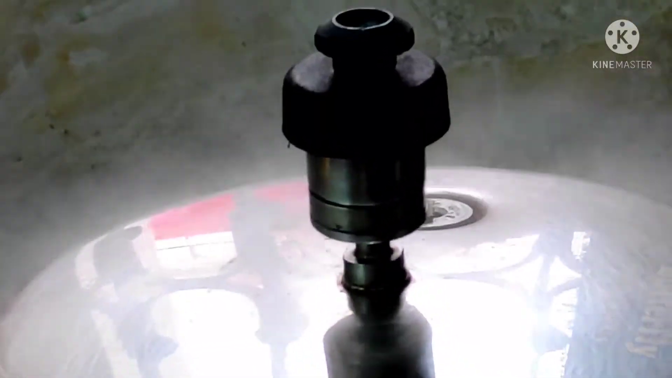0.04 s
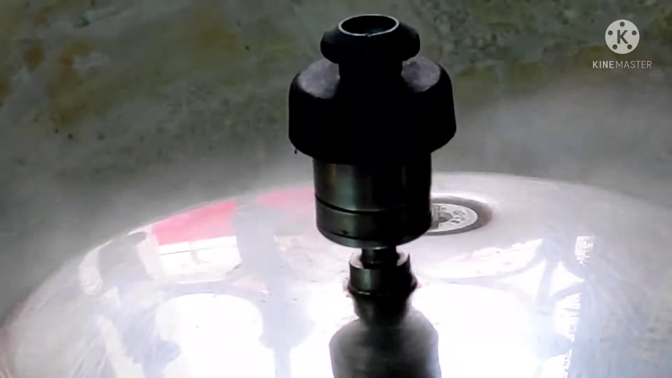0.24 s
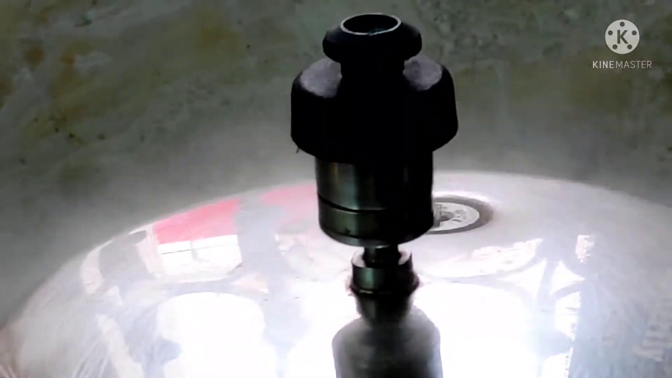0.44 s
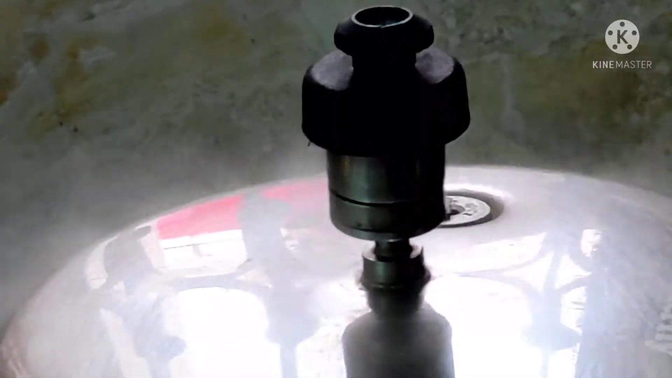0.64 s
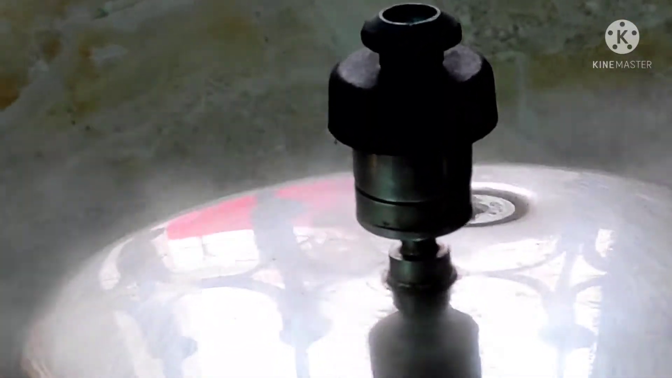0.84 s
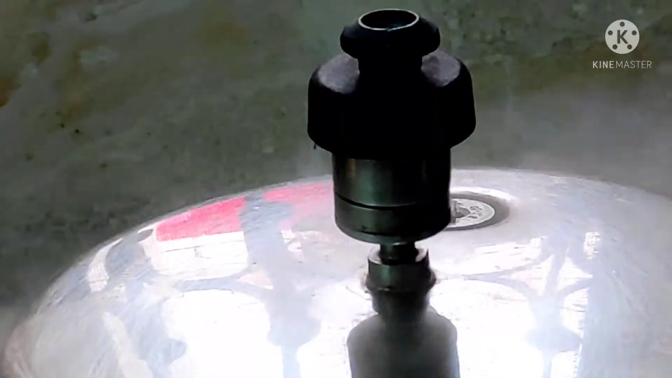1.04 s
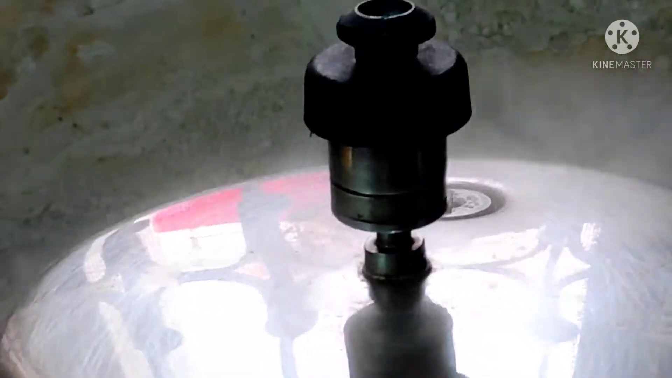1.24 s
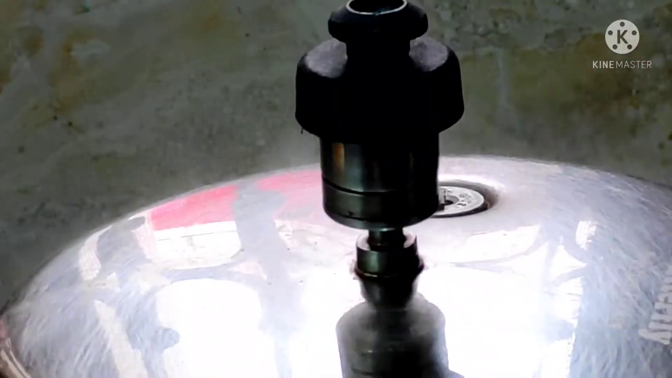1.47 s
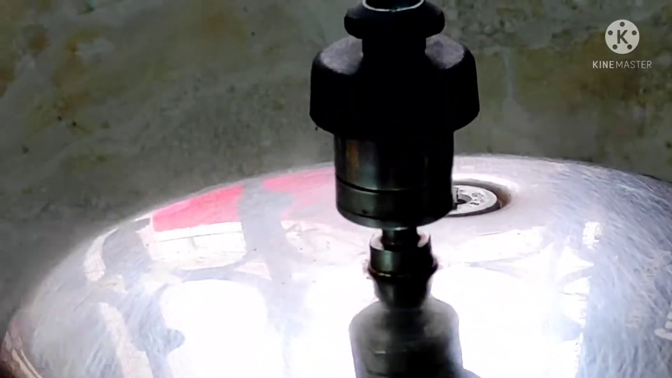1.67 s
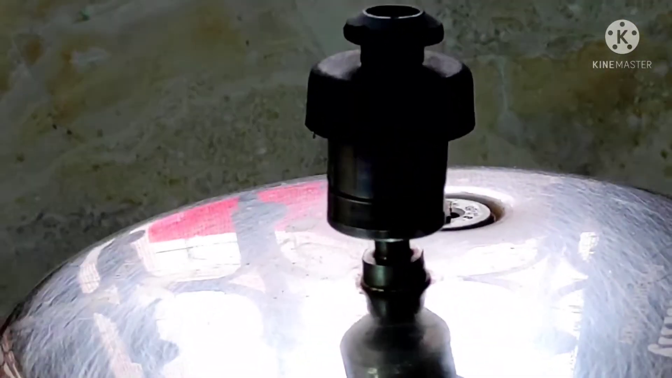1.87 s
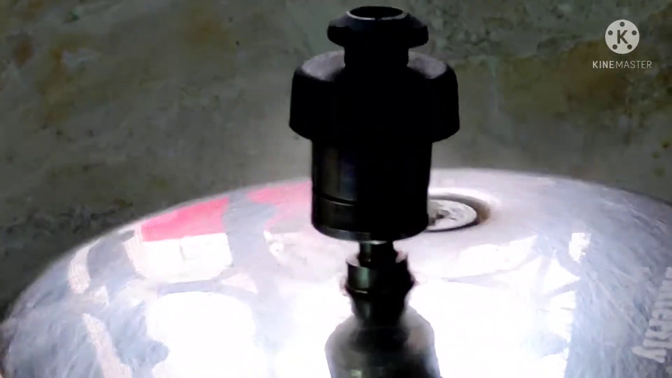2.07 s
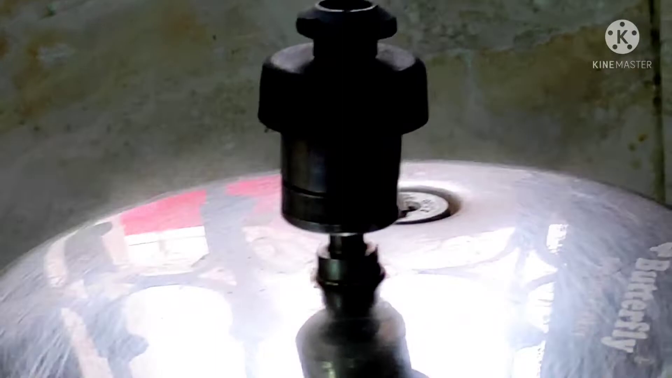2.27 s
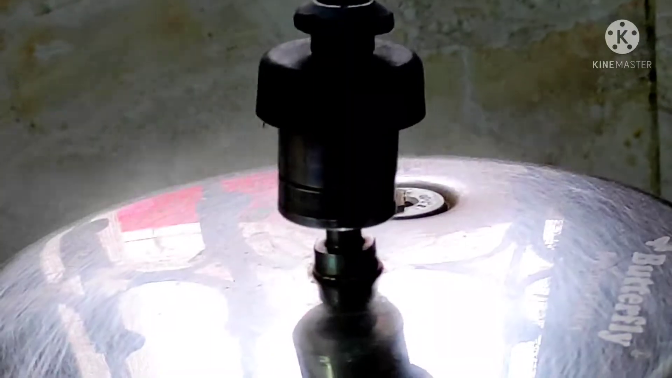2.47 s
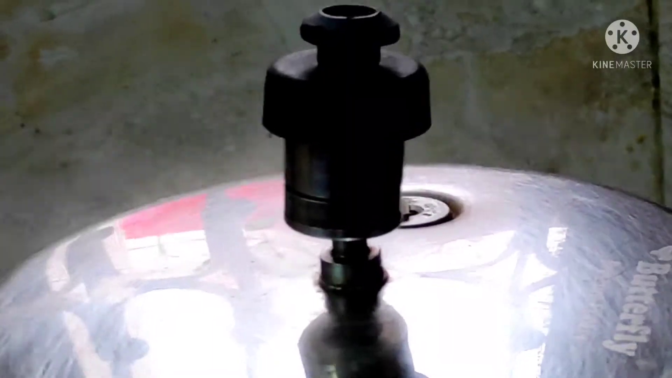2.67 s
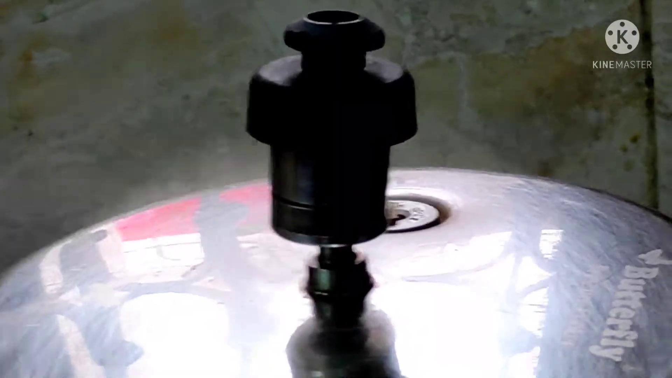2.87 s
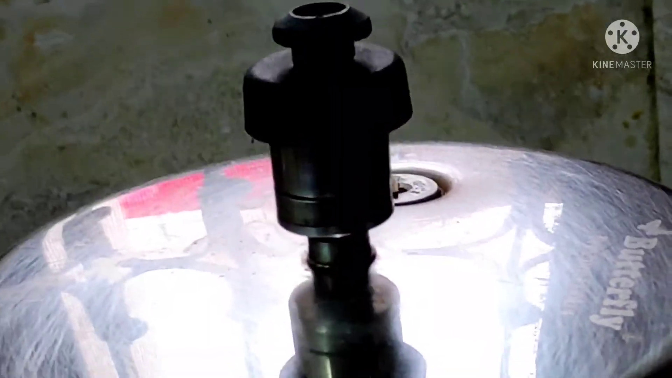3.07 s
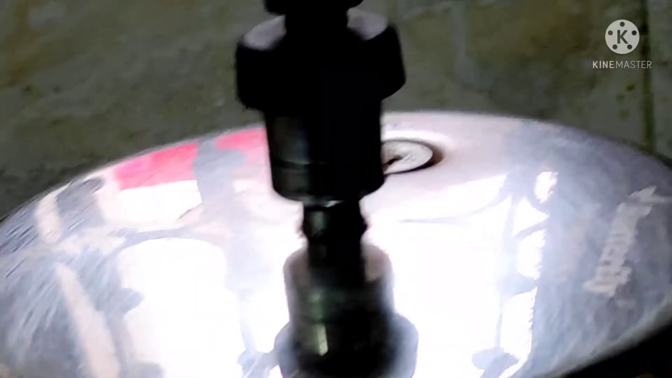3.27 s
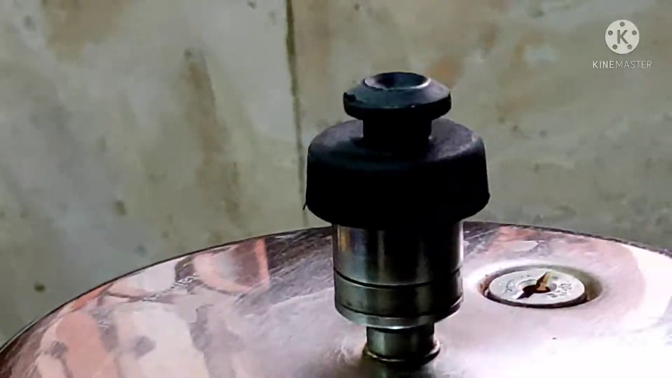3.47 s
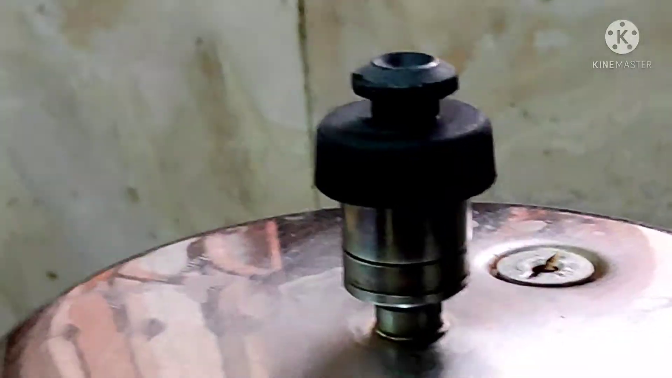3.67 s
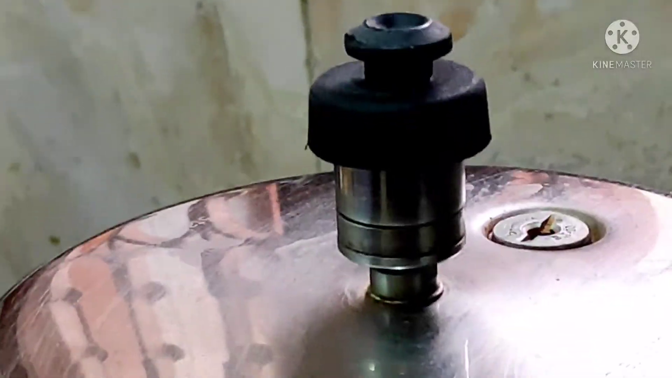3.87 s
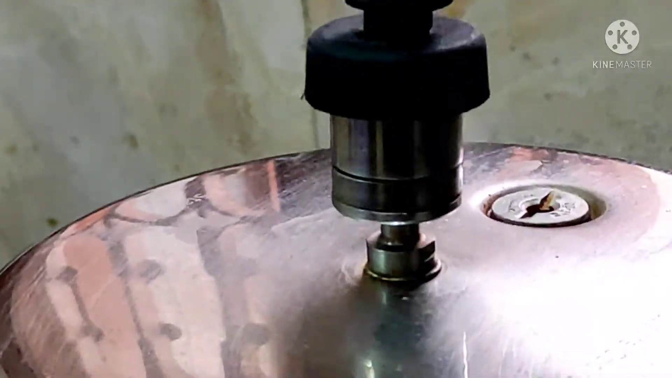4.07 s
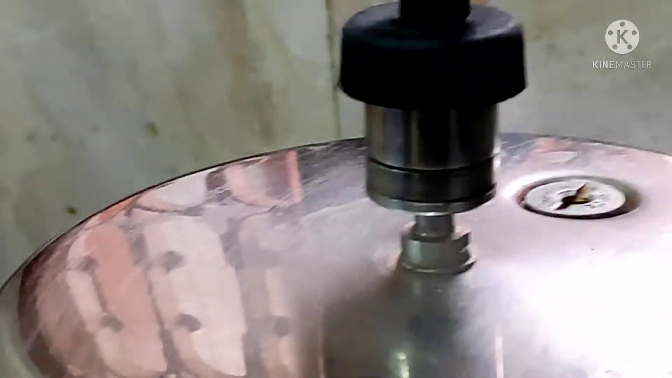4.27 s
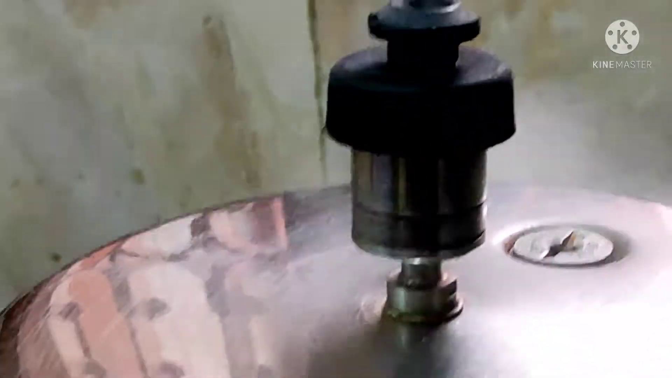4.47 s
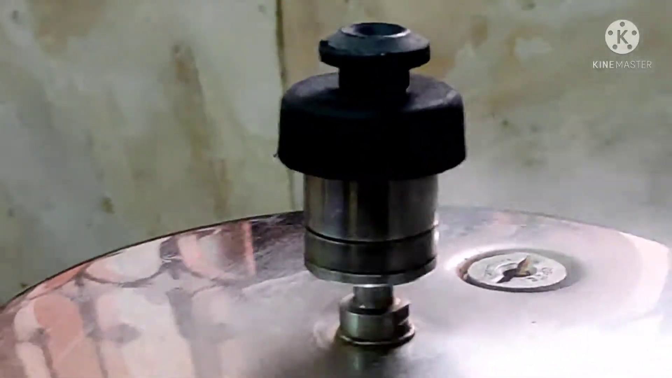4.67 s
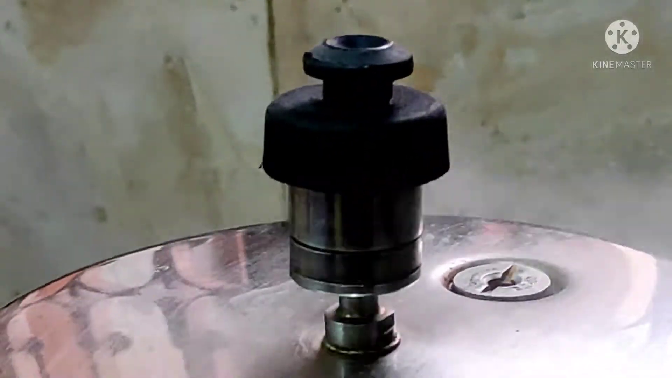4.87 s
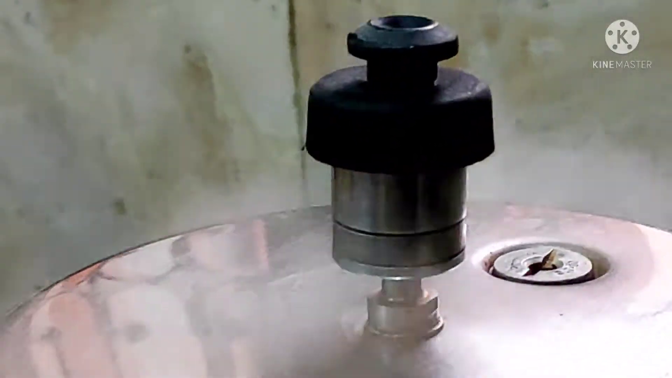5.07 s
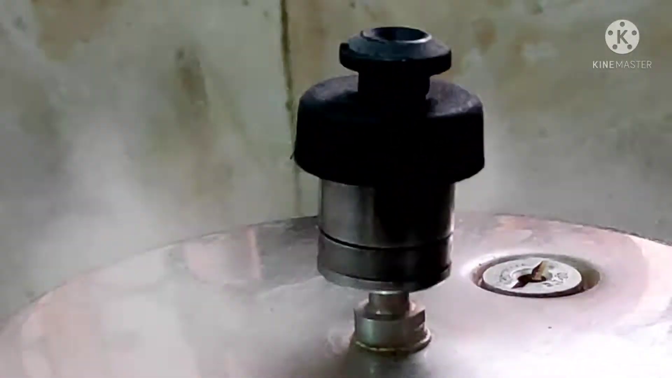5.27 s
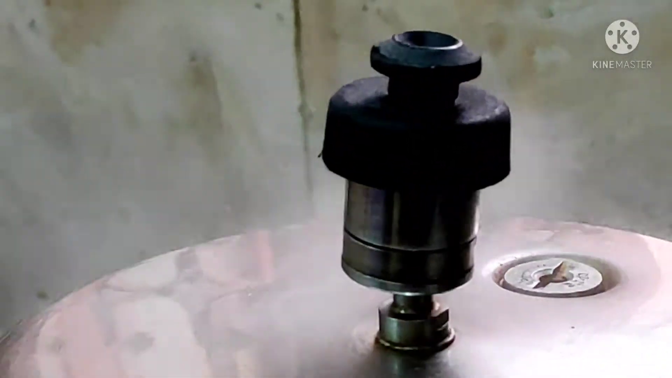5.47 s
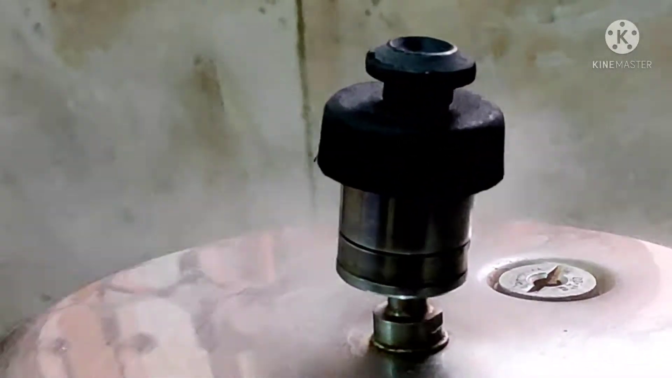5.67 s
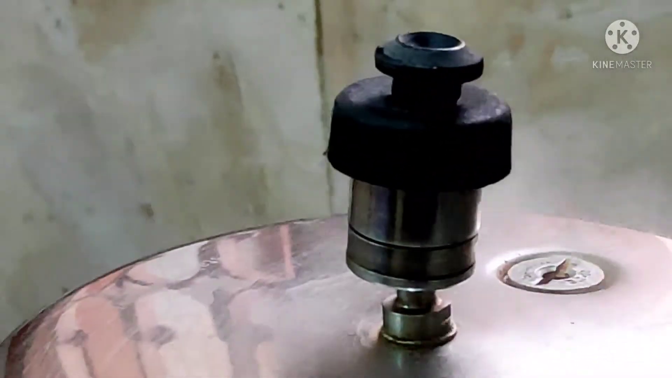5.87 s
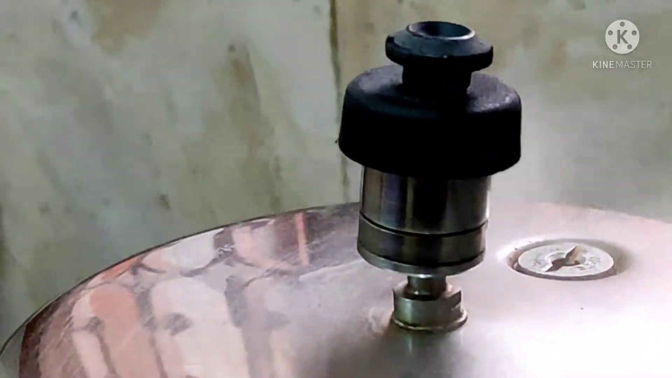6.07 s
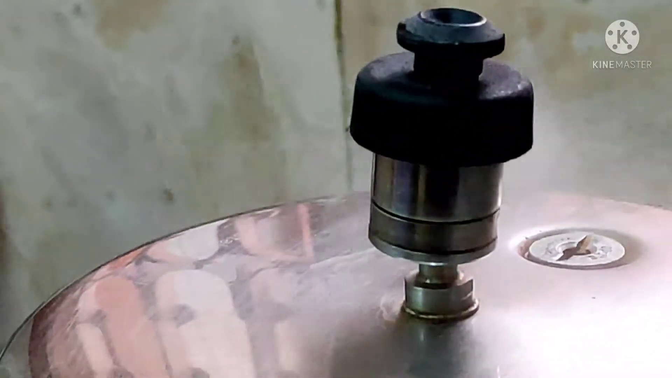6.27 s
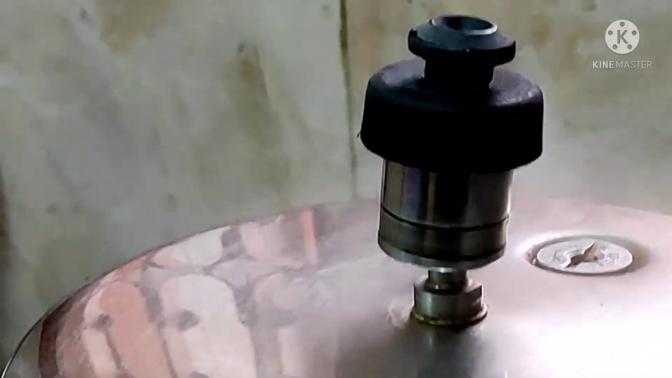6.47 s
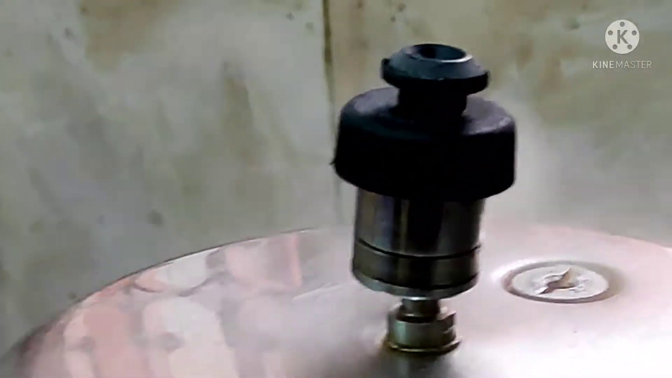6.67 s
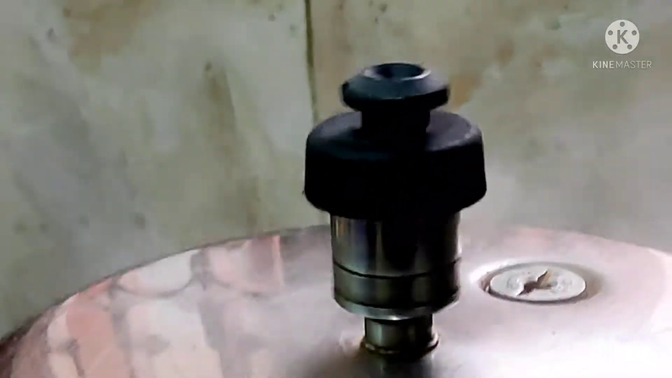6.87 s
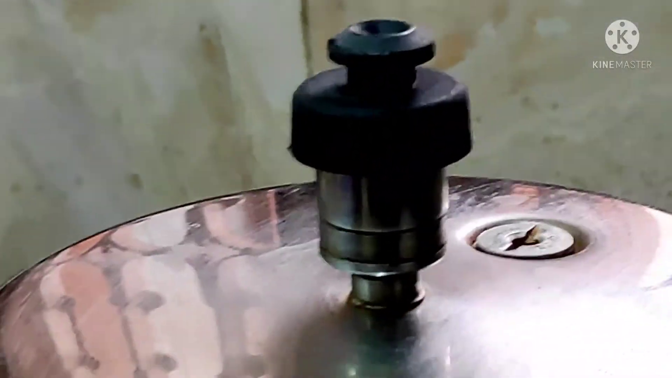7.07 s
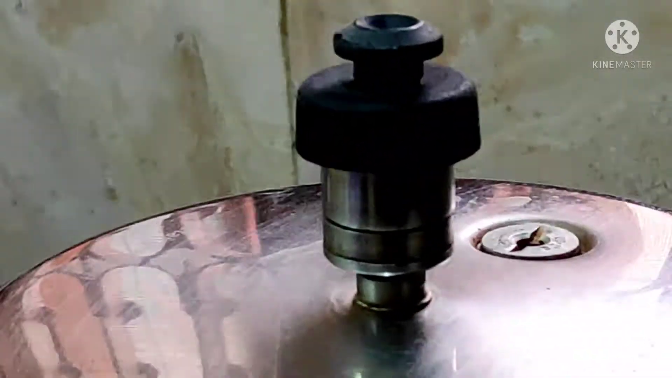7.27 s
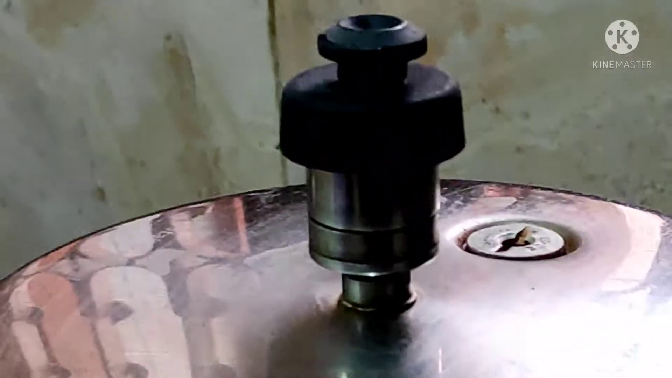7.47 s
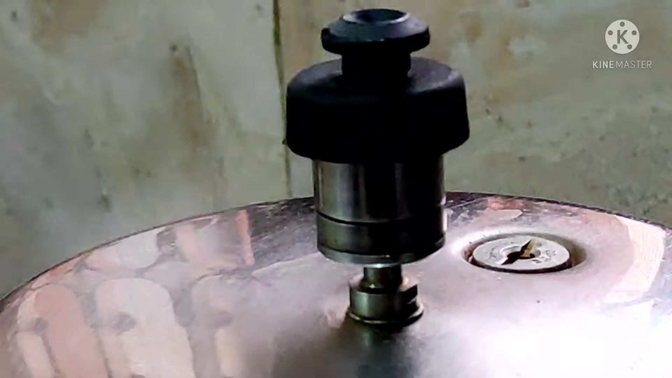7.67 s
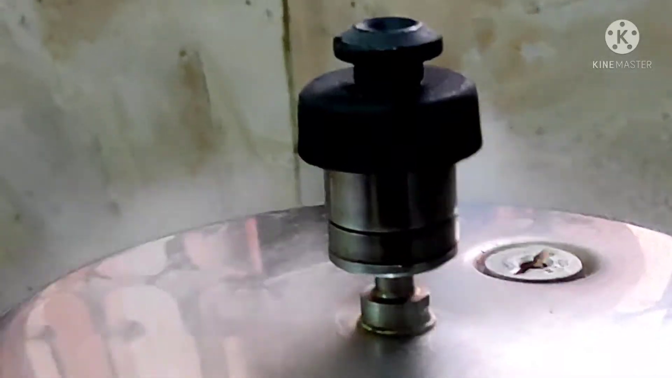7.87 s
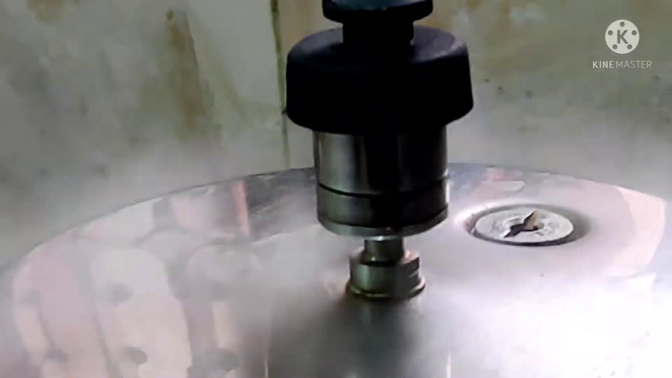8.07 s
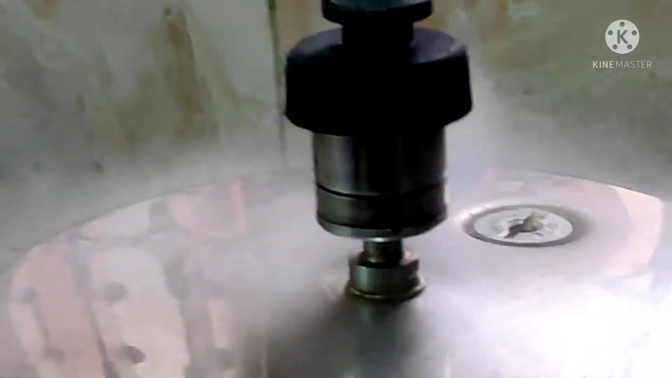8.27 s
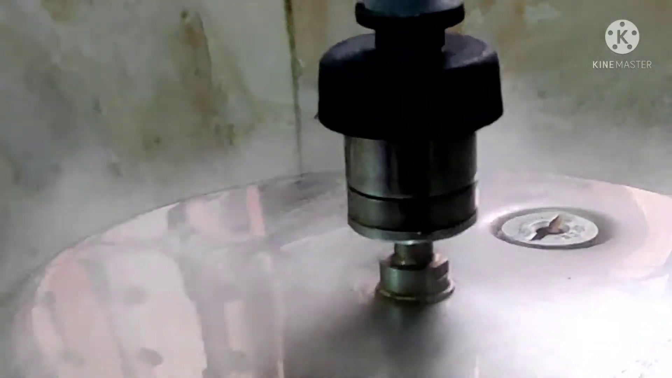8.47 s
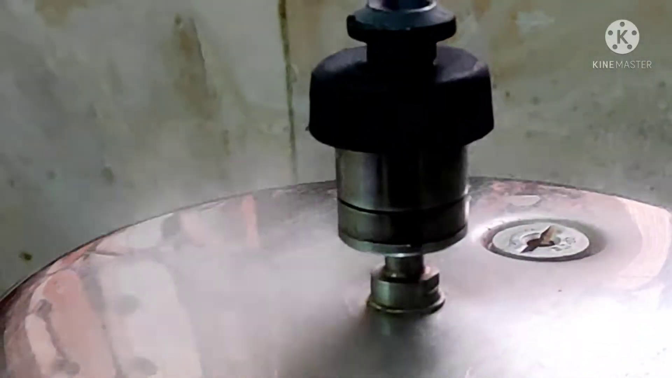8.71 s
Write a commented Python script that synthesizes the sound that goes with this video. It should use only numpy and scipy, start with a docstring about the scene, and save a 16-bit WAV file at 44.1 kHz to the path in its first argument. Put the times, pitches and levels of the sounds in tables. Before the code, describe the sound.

From 0 s a pressure cooker's valve is already wide open, close to the microphone: a loud, broad steam roar under a piercing, very high hiss, fluttering slightly, with brief gusts and low buffeting of air, strongest on the left. It sags slightly until about 3.0 s, when the weight drops and the jet dies within a fraction of a second in a hollow, downward-sinking gush with a faint lid ring. Near quiet, with dull kitchen background, lasts until 3.26 s; then a thin, high leak cracks on, spits around 3.5 s and grows. At 3.9 s the full blast surges back and holds until 6.8 s, then sinks the same way. At 7.1 s a stuttering leak begins with light metallic knocks at 7.07 and 7.27 s. At 7.5 s the final blast bursts open, slightly stronger and with heavier wind buffeting, roaring until the end near 8.7 s.

```python
"""A pressure cooker vents on a stove in a small kitchen, close to a two-port microphone.
At first the weight is up: the jet roars under a very high hiss, both shaped noise, and its draught
buffets the ports. The weight drops with a sinking gush, then the valve cracks open, leaks thinly and
lifts again into a full jet. The same drop, leak and lift follow once more, now with light knocks of the
weight that ring the lid (decaying sines); the last jet runs to the end."""
import sys
import numpy as np
from scipy import signal
from scipy.fft import rfft, irfft
from scipy.io import wavfile
from scipy.ndimage import uniform_filter1d, minimum_filter1d

SR = 44100
rng = np.random.default_rng(int(sys.argv[2]) if len(sys.argv) > 2 else 0)


def waveform_to_disk(signal):
    """Save audio, clipped to [-1, 1], as 16-bit WAV at the path in sys.argv[1]."""
    frames = np.transpose(np.atleast_2d(signal))
    scaled = np.clip(frames, -1, 1) * 32767
    samples = np.round(scaled).astype(np.int16)
    wavfile.write(sys.argv[1], SR, samples)


N = 385434
T = np.arange(N) / SR  # s

# Spectral densities. Each row: frequency in Hz, relative level in dB.
HISS_SPECTRUM = [(1000, -51), (4000, -32), (6000, -26.5), (7000, -20), (9000, -18.5), (10500, -13),
                 (12000, -8.5), (12700, -8.5), (13500, -1.5), (14700, 0.5), (15500, 3)]
ROAR_SPECTRUM = [(40, -34), (150, -7.5), (240, -10.5), (310, -0.84), (600, -0.8), (1300, -1.24), (3000, 1),
                 (5200, 2.5), (6000, 2), (6800, -9), (8500, -7), (11000, -2.5), (15500, -62.5)]
LEAK_HISS_SPECTRUM = [(1000, -57), (4000, -39), (6000, -29), (8000, -24.5), (9700, -20), (11000, -10),
                      (12000, -8), (13000, -2.5), (14700, 1), (15500, 3)]
LEAK_RUSH_SPECTRUM = [(100, -15), (240, -10), (320, -2), (800, -2.5), (1500, -3), (3000, 1), (3900, -3),
                      (4800, 3.3), (5800, 2), (6800, -5), (9000, 1.5), (15000, -16)]
DRAUGHT_SPECTRUM = [(5, -2), (25, 3), (60, -1.5), (130, -5), (250, -9), (600, -32), (2000, -64)]
KITCHEN_SPECTRUM = [(20, 0), (130, -2), (270, -9), (380, -6), (900, -3), (1300, -8), (2200, -17),
                    (3500, -20), (8000, -27), (15000, -32)]
# Correlation of the two ports. Each row: frequency in Hz, correlation from -1 to 1.
PORT_CORRELATION = [(100, 0), (1400, 0.07), (5000, 0.06), (9000, 0.12), (12000, -0.39), (15000, -0.32)]
# Side lean of each jet. Each row: frequency in Hz, left minus right in dB.
ROAR_LEAN = [(100, 2.3), (380, 5.7), (1300, 3.6), (2400, 2.6), (4400, 0.4), (12000, 0.77)]
HISS_LEAN = [(6000, 1), (11000, 1), (15000, -3)]
# A wider jet makes bigger eddies. Each row: frequency in Hz, relative dB for each dB of roar.
DEEPENING_SLOPE = [(100, 1.5), (400, 1.66), (1200, 0.92), (4000, 0.3), (8000, -0.35), (15000, 0)]
# Reverberation of the kitchen. Each row: frequency in Hz, t60 in seconds.
WALL_T60 = [(200, 0.098), (500, 0.51), (1200, 0.33), (3000, 0.26), (7000, 0.19), (15000, 0.1)]
# Light knocks of the weight on its seat. Each row: time in seconds, level in dB.
WEIGHT_KNOCKS = [(7.074, -46), (7.273, -49)]
# Modes of the lid. Each row: frequency in Hz, level in dB, t60 in seconds (knocks only).
LID_MODES = [(430, -2, 0.08), (620, -11, .07), (816, 0, .06), (1120, -9, 0.06)]
# Gusts of steam toward the microphone. Each row: centre in seconds, half length in seconds,
# extra roar in dB, extra draught in dB.
STEAM_GUSTS = [(.12, .04, 0, 1), (0.367, 0.017, 2, 5), (0.615, 0.1, 1, 4), (0.923, 0.067, 1, 3.5),
               (1.17, .04, 0.7, 2), (2.0, 0.099, .5, 0), (3.97, .02, 1, 3), (4.05, 0.024, .8, 3),
               (5.447, .15, .5, -2.5), (6.0, 0.12, 1.06, 0), (6.723, 0.066, 0.54, 3), (7.603, 0.051, .5, 2)]
# Spurts and catches of the leak as the weight teeters. Each row: centre in seconds,
# half length in seconds, extra leak hiss in dB.
LEAK_SPURTS = [(3.52, .015, 7), (3.594, 0.021, 6), (7.118, 0.024, 2.5), (7.19, .015, -5), (7.24, 0.011, 0),
               (7.313, 0.013, 2), (7.355, .015, -3)]
# Blasts of the valve. Each row: crack in seconds, lift in seconds, drop in seconds, first leak hiss in dB,
# hiss in dB, roar in dB, draught at the lift in dB, settled draught in dB,
# extra hiss under HISS_SKIRT_HZ in dB, first leak rush in dB.
VALVE_BLASTS = [(-1.0, -0.2, 2.981, -35, -13.2, -21.3, -37.5, -46.5, .9, -50),
                (3.26, 3.878, 6.811, -36, -13.3, -20.9, -37, -44.5, 1.8, -50),
                (7.089, 7.473, 9.5, -28, -13.6, -19.9, -31.5, -35, -.7, -44.5)]

EDGE_HZ = 15560
KITCHEN_DB, WALLS_DB = -56, -16.5
# lower skirt of the hiss: weaker until the weight has lifted
HISS_SKIRT_HZ, LOW_SKIRT_DB = 11300, -5.5
# leak: abrupt start, growth to a steady level, rush far under the hiss
CRACK_S, LEAK_GROW_S, LEAK_HISS_DB = 0.007, 0.58, -21
LEAK_RUSH_DB, LEAK_RUSH_GROW_S = -43.5, 0.42
# floating weight: the hiss is full shortly before the lift, the roar only stirs
FLOAT_S, HISS_LEAD_S, FLOAT_ROAR_DB = 0.14, 0.012, -34
FLOAT_EXPONENT = 0.15  # small: comes quickly, then levels off
# lift: a surge that sags as the pressure falls
LIFT_S, SURGE_SAG_S, ROAR_SURGE_DB, ROAR_SAG_DB_PER_S = 0.026, 0.66, 1.16, 0.355
# drop: final fall rate in dB/s, easing in s
HISS_FALL, ROAR_FALL, DRAUGHT_FALL = (450, 0.099), (320, 0.03), (300, 0.037)
DRAUGHT_LEAD_S = 0.05  # the draught dies before the drop
# floors: a little steam seeps and the air stirs with the valve shut
SEEP_HISS_DB, SEEP_RUSH_DB, STILL_AIR_DB, OFF_DB = -49, -62, -66.5, -100
# lid ring as the jet is choked off
RING_DB, RING_WIDTH_HZ, RING_AFTER_S, RING_HALF_S = -51.5, 47, 0.1, 0.048
# last gush: a hollow noise band that sinks as the steam slows
GUSH_HZ, GUSH_WIDTH_HZ, GUSH_SINK_OCT_PER_S = 1290, 560, 3
GUSH_DB, GUSH_AFTER_S, GUSH_HALF_S = -33, 0.049, 0.034
WHISTLE_DB, WHISTLE_HZ, WHISTLE_WIDTH_HZ = -44, 3750, 600
PRESSURE_DIP_DB, PRESSURE_DIP_S = -42.0, 0.041


def gain_of(db):
    """Decibels to amplitude."""
    return 10 ** (np.asarray(db) / 20)


def evened(x):
    """Scales to an rms of one."""
    return x / np.sqrt(np.mean(x ** 2) + 1e-20)


def read(points, hz):
    """Interpolates a table along a logarithmic frequency axis."""
    f, value = np.transpose(points)
    return np.interp(np.log(hz + 1), np.log(f + 1), value)


def ramp(start_s, length_s):
    """Linear rise from zero to one."""
    return np.clip((T - start_s) / length_s, 0, 1)


def blend(a, b, share):
    """Moves from a to b as the share goes from zero to one."""
    return a + (b - a) * share


def swell(centre_s, half_s):
    """Gaussian bump of height one."""
    return np.exp(-.5 * ((T - centre_s) / half_s) ** 2)


def wander(slow_hz, fast_hz):
    """Random motion of unit rms: strongest near the slow rate, cut more steeply above the fast one."""
    hz = np.fft.rfftfreq(N, 1 / SR)
    shape = hz / (hz + slow_hz) ** 2.3 / np.sqrt(1 + (hz / fast_hz) ** 4)
    return evened(irfft(rfft(rng.standard_normal(N)) * shape, N))


def resonate(x, hz, width_hz):
    """Resonance along the curve hz: shift to zero, two-pole low-pass, shift back."""
    turn = np.exp(2j * np.pi * np.cumsum(hz) / SR)
    r = np.exp(-np.pi * width_hz / SR)
    low = signal.lfilter([(1 - r) ** 2], [1, -2 * r, r ** 2], x / turn)
    return (turn * low).real


def puffed(x, under_hz, change_db):
    """Lets the part of a sound below a frequency swell and sink on its own."""
    low = signal.sosfiltfilt(signal.butter(3, under_hz, fs=SR, output="sos"), x)
    return x + low * (gain_of(change_db) - 1)


def turbulence(spectrum, lean, patchy_db, size, drive_db=None):
    """Shaped noise at two ports with random patchy flicker across time and frequency; drive_db tilts it."""
    hz = np.fft.rfftfreq(size, 1 / SR)
    hop = size // 4
    a, b, c, d, patches = rng.standard_normal((N // hop + 5, len(hz), 5)).T
    patches = uniform_filter1d(patches, size=6, axis=0)
    patches = evened(uniform_filter1d(patches, size=5, axis=1))
    patch_gain = gain_of(patchy_db * patches)
    patch_gain /= np.sqrt(uniform_filter1d(patch_gain ** 2, size=31, axis=0))  # evens power across nearby bins

    same = np.clip(read(PORT_CORRELATION, hz), -1, 1)[:, None]
    left = a + 1j * b
    right = same * left + np.sqrt(1 - same ** 2) * (c + 1j * d)
    z = np.array([left, right])

    lean_db = np.array([read(lean, hz), -read(lean, hz)])[:, :, None] / 2
    in_band = (hz < EDGE_HZ + 200)[:, None]
    z *= patch_gain * gain_of(read(spectrum, hz)[:, None] + lean_db) * in_band
    if drive_db is not None:
        frame_db = np.interp(np.arange(z.shape[2]) * hop / SR, T, drive_db)
        z *= gain_of(read(DEEPENING_SLOPE, hz)[:, None] * frame_db)
    return evened(signal.istft(z, nperseg=size, noverlap=size - hop)[1][:, :N])


def kitchen():
    """Dull, steady background noise."""
    noise = turbulence(KITCHEN_SPECTRUM, [(100, 1.5), (3000, .3)], patchy_db=3.5, size=2048)
    return gain_of(KITCHEN_DB) * noise


def walls(x):
    """Diffuse tail of decaying noise in which the low mids outlast the treble."""
    hz, t, z = signal.stft(rng.standard_normal((2, SR // 2)), SR, nperseg=256)
    t60 = read(WALL_T60, hz)[:, None]
    decay = gain_of(-60 * t / t60) * (t > .005)
    tail = signal.istft(z * decay, SR, nperseg=256)[1]
    return signal.fftconvolve(x, tail / np.linalg.norm(tail[0]), axes=1)[:, :N]


def draught(air_db):
    """Lumps of moving air strike the ports, the left one most."""
    air = turbulence(DRAUGHT_SPECTRUM, [(30, 11.7), (200, 12.7)], patchy_db=1.5, size=4096)
    lumps = np.tanh(wander(slow_hz=10, fast_hz=19))
    return air * gain_of(air_db + 6.2 * lumps)


def gusts():
    """Brief swells (dB) of the roar and of the draught."""
    return sum(np.outer([roar_db, air_db], swell(centre_s, half_s))
               for centre_s, half_s, roar_db, air_db in STEAM_GUSTS)


def knocks():
    """The weight nudges its seat and the lid modes answer as decaying sines."""
    out = np.zeros(N)
    for knock_s, knock_db in WEIGHT_KNOCKS:
        t = np.maximum(T - knock_s, 0)
        for hz, mode_db, t60 in LID_MODES:
            out += gain_of(knock_db + mode_db - 60 * t / t60) * np.sin(2 * np.pi * hz * t)
    return out


def closings():
    """The slowing jet ends in a sinking gush, a trace of whistle, a lid ring and a pressure dip that swings back."""
    rush = turbulence(ROAR_SPECTRUM, ROAR_LEAN, patchy_db=6.5, size=1024)
    whistle = evened(resonate(rush, np.full(N, WHISTLE_HZ), WHISTLE_WIDTH_HZ))
    ring = evened(sum(gain_of(db) * resonate(rush, np.full(N, hz), RING_WIDTH_HZ)
                      for hz, db, _ in LID_MODES))
    out = np.zeros((2, N))
    for _, _, drop_s, *_ in VALVE_BLASTS:
        out += gain_of(RING_DB) * ring * swell(drop_s + RING_AFTER_S, RING_HALF_S)

        gush_s = drop_s + GUSH_AFTER_S
        t = T - gush_s
        gush_hz = GUSH_HZ * 2 ** np.clip(-GUSH_SINK_OCT_PER_S * t, -1, .5)
        gush = evened(resonate(rush, gush_hz, GUSH_WIDTH_HZ))
        last_steam = gain_of(GUSH_DB) * gush + gain_of(WHISTLE_DB) * whistle
        out += last_steam * swell(gush_s, GUSH_HALF_S)

        u = np.maximum(t / PRESSURE_DIP_S + 1, 0)
        out -= gain_of(PRESSURE_DIP_DB) * np.e * u * (2 - u) * np.exp(-u)
    return out


def shutting(drop_s, db_per_s, ease_s):
    """Loss in dB as the weight sinks onto its seat, slowly at first."""
    return db_per_s * (np.hypot(np.maximum(T - drop_s, 0), ease_s) - ease_s)


def valve():
    """Crack, leak, float, lift, sag, drop: levels (dB) of leak, hiss, skirt, roar and draught."""
    leak_hiss, leak_rush, air = SEEP_HISS_DB, SEEP_RUSH_DB, STILL_AIR_DB
    thin, full, skirt = OFF_DB, OFF_DB, LOW_SKIRT_DB
    for (crack_s, lift_s, drop_s, first_hiss_db, hiss_db, roar_db,
         lift_air_db, settled_air_db, skirt_db, first_rush_db) in VALVE_BLASTS:
        cracked = ramp(crack_s - CRACK_S / 2, CRACK_S)
        lifted = ramp(lift_s, LIFT_S)
        open_s = np.maximum(T - lift_s, 0)
        surge = np.exp(-open_s / SURGE_SAG_S)

        leaking = cracked * (1 - lifted)
        growing = blend(first_hiss_db, LEAK_HISS_DB, ramp(crack_s, LEAK_GROW_S))
        leak_hiss = np.maximum(leak_hiss, blend(SEEP_HISS_DB, growing, leaking))
        swelling = blend(first_rush_db, LEAK_RUSH_DB, ramp(crack_s, LEAK_RUSH_GROW_S))
        leak_rush = np.maximum(leak_rush, blend(SEEP_RUSH_DB, swelling, leaking))

        hiss_rise = ramp(lift_s - FLOAT_S - HISS_LEAD_S, FLOAT_S) ** FLOAT_EXPONENT
        gap = blend(OFF_DB, hiss_db, hiss_rise)
        thin = np.maximum(thin, gap - shutting(drop_s, *HISS_FALL))
        skirt = blend(skirt, skirt_db, lifted * (1 - ramp(drop_s, LIFT_S)))

        floating = blend(OFF_DB, FLOAT_ROAR_DB, ramp(lift_s - FLOAT_S, FLOAT_S) ** FLOAT_EXPONENT)
        sagging = roar_db + ROAR_SURGE_DB * surge - ROAR_SAG_DB_PER_S * open_s
        rush = blend(floating, sagging, lifted)
        full = np.maximum(full, rush - shutting(drop_s, *ROAR_FALL))

        wind = blend(STILL_AIR_DB, blend(settled_air_db, lift_air_db, surge), lifted)
        air = np.maximum(air, wind - shutting(drop_s - DRAUGHT_LEAD_S, *DRAUGHT_FALL))
    return leak_hiss, leak_rush, thin, skirt, full, air


def leak(hiss_db, rush_db):
    """The barely open seat: a thinner hiss over a faint, broad rush."""
    thin = turbulence(LEAK_HISS_SPECTRUM, HISS_LEAN, patchy_db=8.0, size=2048)
    rush = turbulence(LEAK_RUSH_SPECTRUM, ROAR_LEAN, patchy_db=3.5, size=1024)
    thin = thin * gain_of(hiss_db + 1.7 * wander(slow_hz=6.6, fast_hz=25))
    return thin + rush * gain_of(rush_db + 0.65 * wander(slow_hz=14, fast_hz=60))


def hiss(flow_db, skirt_db, sputter):
    """The narrow gap makes tiny, fast eddies: the sound peaks in the highest treble."""
    jet = turbulence(HISS_SPECTRUM, HISS_LEAN, patchy_db=12.5, size=2048)
    jet = puffed(jet, under_hz=HISS_SKIRT_HZ, change_db=skirt_db + 2.0 * wander(slow_hz=6.7, fast_hz=25))
    flutter_db = .5 * sputter + .8 * wander(slow_hz=50, fast_hz=300)
    drift_db = .5 * wander(slow_hz=3.7, fast_hz=16)
    return jet * gain_of(flow_db + flutter_db + drift_db)


def roar(flow_db, sputter, usual_db=-21.5, span_db=8.0):
    """The wide-open jet is a broad rush that deepens as the weight lifts; its lowest eddies come in puffs."""
    drive_db = np.clip(flow_db - usual_db, -span_db, span_db)
    jet = turbulence(ROAR_SPECTRUM, ROAR_LEAN, patchy_db=2.5, size=1024, drive_db=drive_db)
    jet = puffed(jet, under_hz=900, change_db=1.2 * wander(slow_hz=5.2, fast_hz=32))
    jet = puffed(jet, under_hz=239, change_db=-2.5 + 7 * np.tanh(wander(slow_hz=9, fast_hz=20)))
    flutter_db = 0.48 * sputter + 0.55 * wander(slow_hz=25, fast_hz=160)
    return jet * gain_of(flow_db + flutter_db)


def scene():
    """The valve drives leak, hiss, roar and draught; wet steam makes hiss and roar sputter together."""
    leak_hiss_db, leak_rush_db, hiss_db, skirt_db, roar_db, air_db = valve()
    gust_roar_db, gust_air_db = gusts()
    spurt_db = sum(db * swell(centre_s, half_s) for centre_s, half_s, db in LEAK_SPURTS)
    sputter = wander(slow_hz=19, fast_hz=32)
    steam = leak(leak_hiss_db + spurt_db, leak_rush_db)
    steam = steam + hiss(hiss_db, skirt_db, sputter)
    steam = steam + roar(roar_db + gust_roar_db, sputter)
    room = kitchen() + walls(gain_of(WALLS_DB) * steam)
    return room + draught(air_db + gust_air_db) + knocks() + closings() + steam


def record(dry):
    """A fast limiter tames peaks above 0.9; then a steep low-pass at EDGE_HZ."""
    over = np.maximum(abs(dry).max(0) / .9, 1)
    held = dry * uniform_filter1d(minimum_filter1d(1 / over, size=65), size=65)
    low_pass = signal.firwin(1023, EDGE_HZ, window=("kaiser", 9), fs=SR)
    return signal.oaconvolve(held, low_pass[None], "same")


dry = scene()
out = record(dry)
waveform_to_disk(out)
```